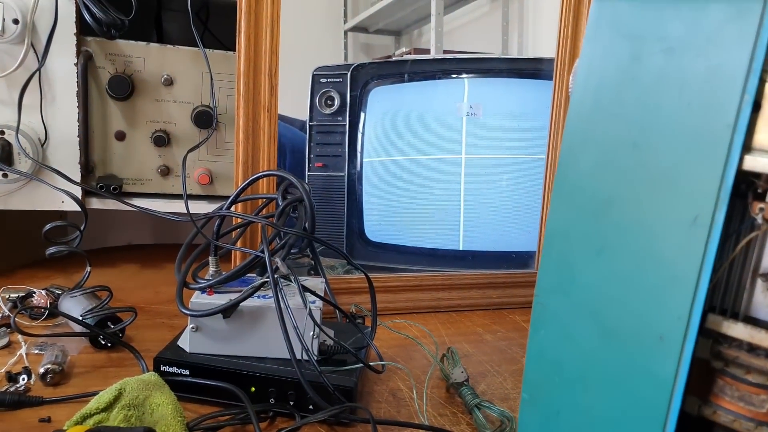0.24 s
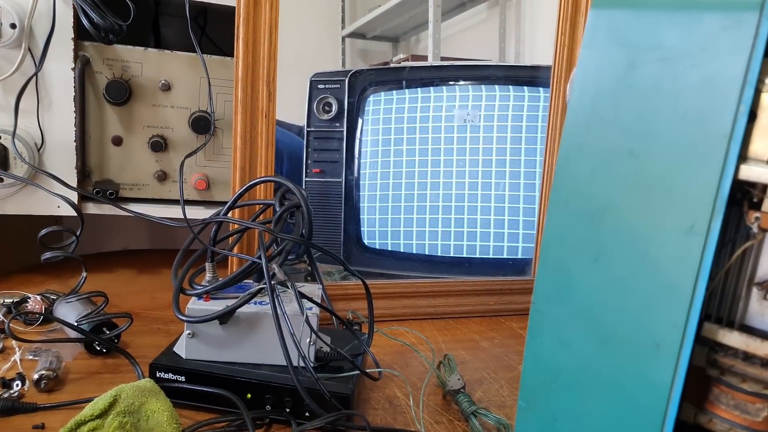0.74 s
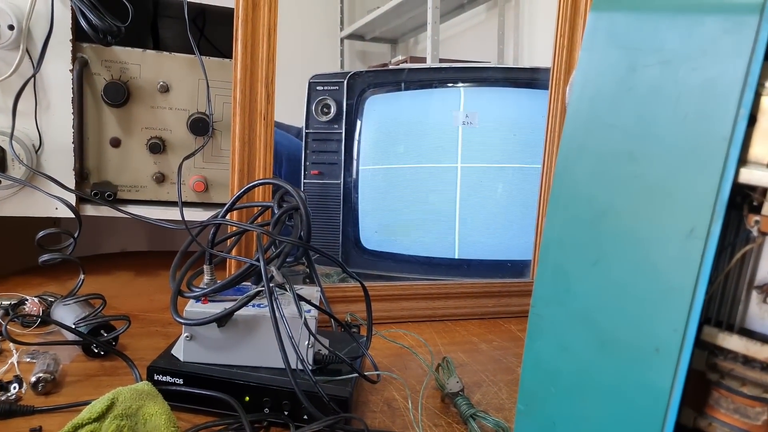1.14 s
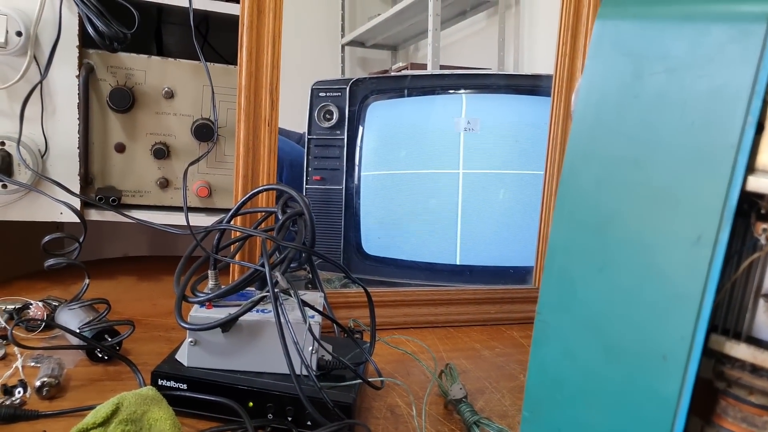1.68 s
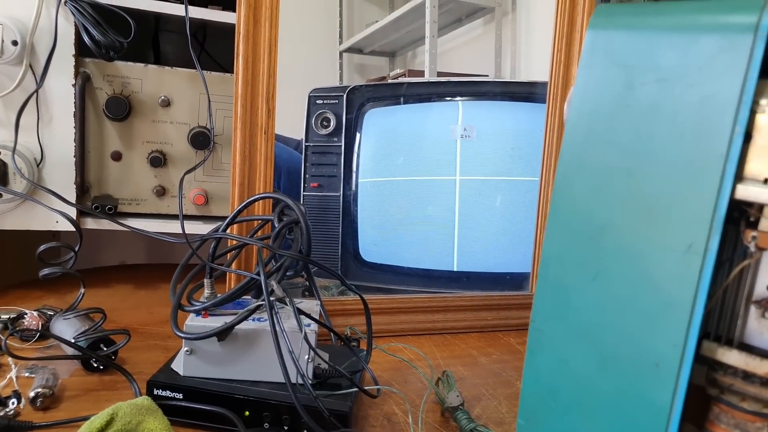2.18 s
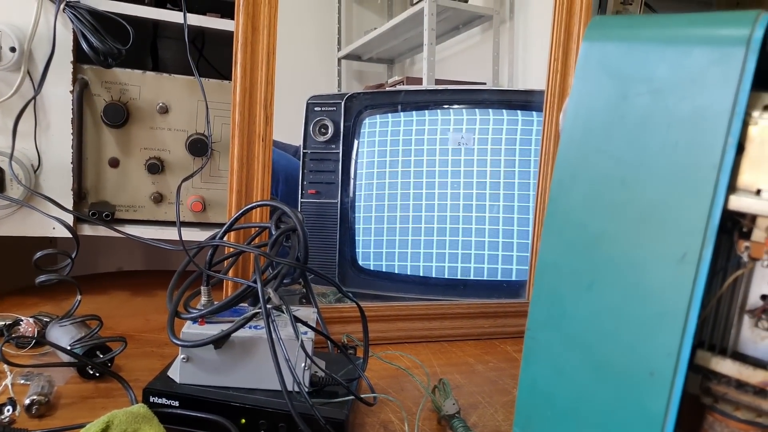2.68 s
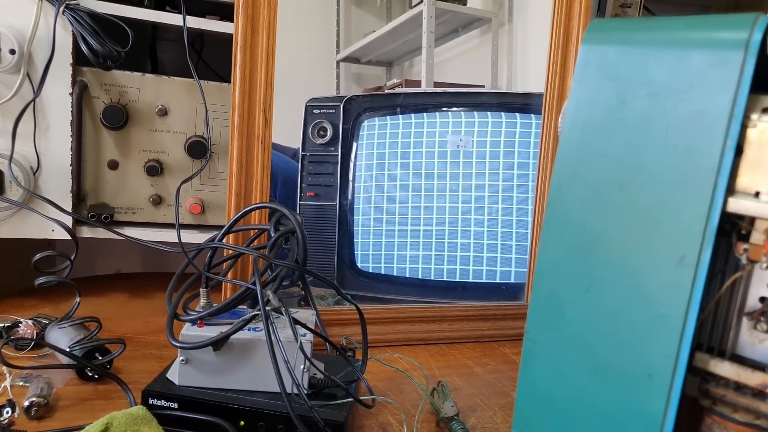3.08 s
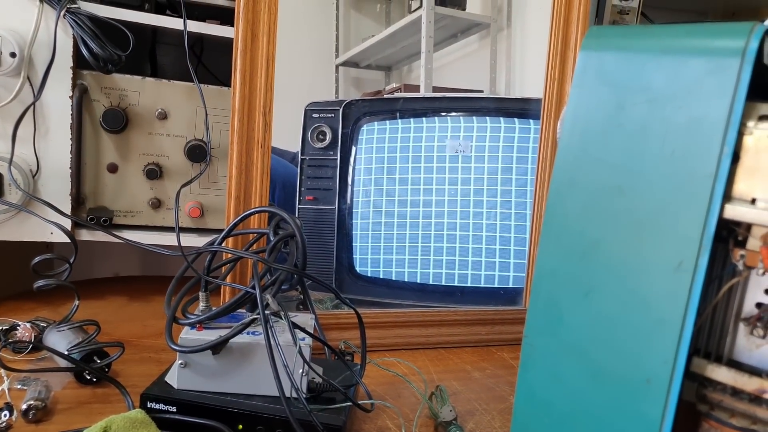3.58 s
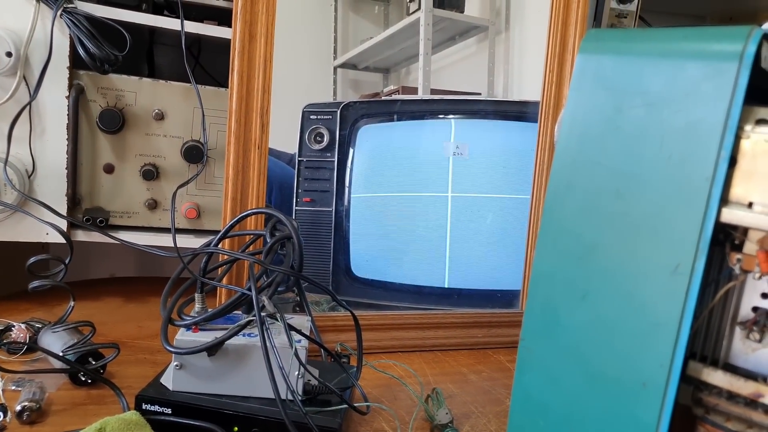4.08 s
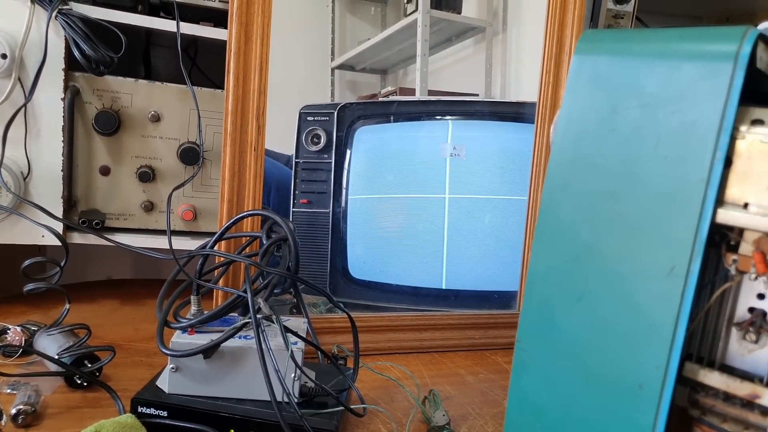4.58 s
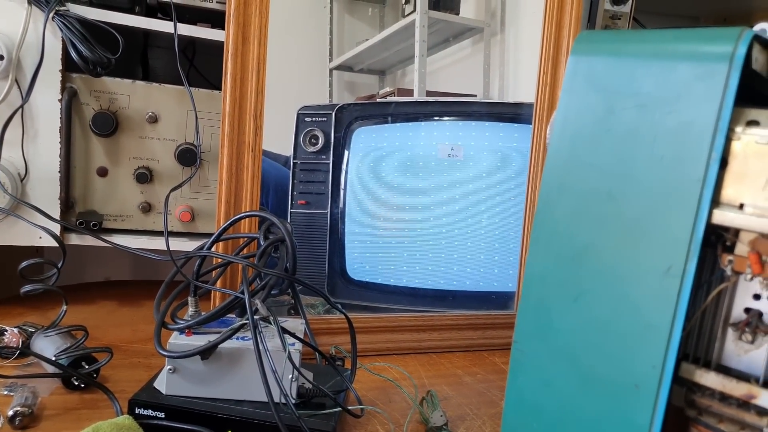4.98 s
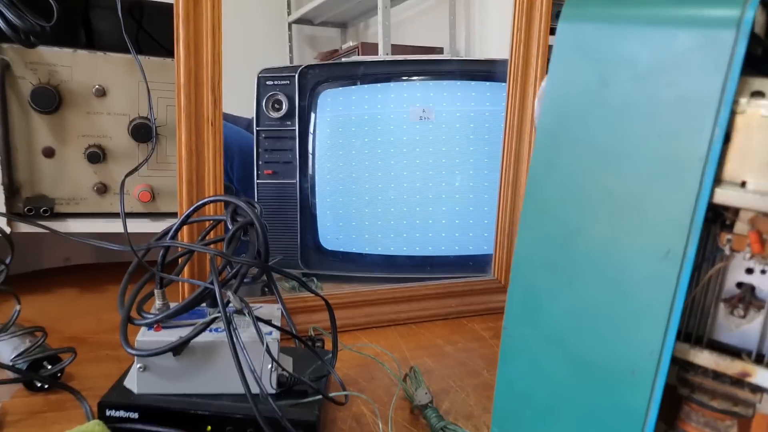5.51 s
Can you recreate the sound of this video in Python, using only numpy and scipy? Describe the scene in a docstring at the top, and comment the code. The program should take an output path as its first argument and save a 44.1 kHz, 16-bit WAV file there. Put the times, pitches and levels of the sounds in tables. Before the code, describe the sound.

A stiff selector knob on a metal instrument clunks through five crisp steps, each with short bright room reverb, above quiet hum-like rumble and tube-screen whistle.

```python
"""A rotary switch on a metal-cased bench instrument is stepped one way and back in a small hard room.
At each step a spring catch slips, snaps and bounces: clicks set off dying sines for the spring and case.
The room answers with echoes and a tail of fading noise, and the bench top booms.
Dull floor thumps are low sines; a soft rub is noise in three resonances.
A picture tube whistles one pure tone over rumble and hiss; one microphone feeds both channels."""
import sys
import numpy as np
from scipy import signal
from scipy.fft import rfft, irfft, next_fast_len
from scipy.io import wavfile

SR = 44100
rng = np.random.default_rng(int(sys.argv[2]) if len(sys.argv) > 2 else 0)


def transcribe(u):
    """Save the signal u as a 16-bit wav file named by the first command-line argument.

    u: samples, shape (n,) or (channels, n), limited to [-1, 1]; the rate is SR.
    q: integer samples, one column per channel.
    """
    v = np.clip(np.atleast_2d(u).T, -1, 1)
    q = np.round(v * 32767).astype(np.int16)
    wavfile.write(sys.argv[1], SR, q)


N = 253520

# In every table, fade60_s is the time to die by 60 dB.
WAYS = ("forward", "back")   # turning directions; a way of 0 or 1 picks one
# switch steps: snap_s, bright_snap_db, case_knock_db, bench_boom_db, slip_lead_s, slip_db,
# bounce_gap_s, first_bounce_db, direction
STEPS = [(0.47, -13, -20.5, -34, 0.0022, -34.5, .0005, -13, "forward"),
         (1.0152, -20.5, -23.5, -34, .0020, -35, .0006, -21, "back"),
         (2.5906, -12, -19, -37, 0.0022, -27, .0006, -15, "forward"),
         (4.0274, -19, -24, -28, .0032, -24, 0.001094, -17.5, "back"),
         (4.6152, -12.5, -19.5, -29, .0022, -23.5, .0025, -18, "forward")]
# the knob takes up its play before a step: start_s, bright_snap_db, case_knock_db, knock_pitch_hz, direction
TICKS = [(0.3877, -42, -50, 1454, "forward"), (2.366, -56, -49.5, 2300, "back")]
# short rings of spring and switch wafer: pitch_hz, forward_db, back_db, fade60_s
SNAP_RINGS = [(820, -5.5, -1.5, 0.01), (3190, 0.5, -12, 0.012), (5220, 1, -5, 0.0053),
              (10336, 1, 3, 0.0082), (10760, 1.5, 3, 0.0043), (11276, -3, -0.5, 0.018),
              (13150, -6.5, -2, 0.0049), (15000, -9, 0.5, 0.0074), (16300, -10, -9.5, .004)]
# longer rings of case and bench: pitch_hz, forward_db, back_db, fade60_s
CASE_RINGS = [(268.7, -23, -22, 0.35), (411.4, -26, -16, 0.45), (515.6, -19, -17, .5),
              (547.5, -26.5, -24.5, 0.45), (743, -22, -19.5, 0.35), (807.5, -20, -17.5, .3),
              (967, -14, -13.5, 0.22), (1007, -18, -27, 0.27), (1214, -17.5, -20.5, 0.33),
              (1514, -18, -21, .45), (1580, -25, -19.5, .27), (1745, -19.5, -30, 0.26),
              (1817, -16, -23.5, 0.25), (1965, -27.5, -19, .4), (2476, -28.5, -27, .3),
              (2990, -22.5, -16, 0.3), (3203, -21.5, -23.5, .35), (3230, -19, -30, 0.33),
              (4577, -24, -23.5, .25), (5100, -22, -22, 0.3)]
# reflections from bench and walls: delay_s, level_db
ECHOES = [(.0042, -8.5), (.0080, -20.5), (0.011, -23)]
# how fast the room dies away: pitch_hz, fade60_s
ROOM_FADE = [(120, 0.45), (320, 0.53), (840, 0.48), (2210, 0.43), (5820, 0.41), (15400, 0.3)]
# room tail level, one row per direction (forward, back): below_split_db, above_split_db
TAIL_DB = [(-5.5, -7), (-4, -5)]
# colour of the room tail in the range of the case: pitch_hz, forward_db_per_hz, back_db_per_hz
TAIL_BODY = [(69, -37.5, -45.5), (115, -7, -5.5), (221, -18.5, -9.5), (315, -7.5, -5), (534, -7.5, -4),
             (691, -14, -12.5), (960, -2.5, -7), (1105, -14, -7), (1155, -5, -5.5), (1520, -5.5, -7.5),
             (1660, -15, -5.5), (1750, -6, -9), (2230, -11, -7), (2496, -11, -12), (2713, -9, -9),
             (3250, -4.5, -12), (3460, -10, -14), (3760, -14, -17)]
# colour of the room tail in the treble, with the dip and peak of the microphone port:
# pitch_hz, forward_db_per_hz, back_db_per_hz
TAIL_TREBLE = [(3970, -19.5, -18.5), (4525, -13, -16), (4967, -11.5, -14), (6520, -24.5, -19.5),
               (8000, -38.5, -29.5), (8880, -21.5, -21), (10530, -12.5, -7.5), (11520, -15, -10.5),
               (12800, -25, -16), (14000, -24, -18), (15600, -26.5, -21.5)]
# dull thumps through the floor: start_s, strength_db, pitch_hz
THUMPS = [(1.484, -34.5, 52), (1.79, -36.5, 57.6), (3.265, -26.5, 75), (3.307, -32, 73.5),
          (4.941, -37, 54.7), (5.369, -34, 54.8)]
# bench resonances heard in the soft rub: pitch_hz, width_hz, level_db
RUB_RESONANCES = [(226.3, 50, -1), (378, 30, 2), (472, 30, 0)]
# level of the whistle over time: time_s, rms_db
WHISTLE_LEVEL = [(0, -68), (.2, -64), (.35, -74), (.7, -69.5), (.95, -68), (1.3, -66), (1.7, -57.5),
                 (2.2, -60), (2.8, -55.5), (3.45, -57), (4.1, -53.5), (5.0, -56), (5.2, -57), (5.3, -66),
                 (5.45, -78), (5.55, -71), (5.67, -79.5), (5.75, -63.5)]
# level of the steady background over time: time_s, rumble_db, hiss_db
BACKGROUND = [(0, -65, -66.5), (.4, -64.5, -66.5), (.85, -58, -63.5), (1.4, -61, -63.5), (2.55, -60, -62),
              (2.95, -58, -62), (3.2, -61.5, -62.5), (4.35, -59.5, -63), (5.1, -61.5, -63),
              (5.42, -64.5, -66), (5.75, -60, -64)]
# colour of the room rumble: pitch_hz, level_db_per_hz
RUMBLE = [(12, -45.5), (22, -24.5), (37, -8), (57, -0.5), (88, -8), (120, -5), (150, -9), (206, -9.5),
          (238, -12.5), (500, -18.5), (650, -46.5), (1100, -120)]
# colour of the hiss: pitch_hz, level_db_per_hz
HISS = [(180, -32), (300, -13.5), (365, -8.5), (766, -9), (889, -10), (1630, -13.5), (3970, -17.5),
        (7060, -28.5), (13200, -21), (14600, -24), (15300, -7)]
# how quickly the rumble level wanders: rate_hz, level_db_per_hz
LUMPS = [(1, 0), (5, 0), (15, -30), (200, -120)]

SPLIT_HZ = 6460   # knocks drive the sound below this, bright snaps above it
SWITCH_LOW_HZ = 70   # the switch sounds are cut away below this
SLIP_TICKS, SLIP_RISE_DB = 6, 7   # a slip is a run of small ticks that grows up to the snap
BOUNCES, BOUNCE_LOSS_DB = 3, 7   # each further bounce is weaker
LIGHT_KNOCK_DB = -14.5   # slips and bounces hardly knock the case
TICK_SHARPNESS = 2.2   # pitch divided by width of a tick's knock
CASE_RISE_S = 0.0042
BUILD_S, BUILD_CYCLES = 0.00063, 4.3   # the room fills later in the bass
BOOM_HZ, BOOM_RISE_S, BOOM_FADE60_S = 225, .03, .22   # lowest mode of the bench top
THUMP_CYCLES = 4.7   # cycles to die by 60 dB
RUB_START_S, RUB_DB, RUB_RISE_S, RUB_FADE60_S = 4.89, -54, .012, 1.2
WHISTLE_HZ = 15730
LUMP_DB = 1.5   # typical spread of the rumble level
NOISE_TOP_HZ = 15760   # coloured noise stops here
CUTOFF_HZ = 17150   # the microphone channel stops here


def from_db(db):
    """Turn decibels into a multiplier."""
    return 10 ** (np.asarray(db, float) / 20)


def rms_one(x):
    """Scale a sound so its rms (average strength) is 1."""
    return x / np.sqrt(np.mean(x ** 2) + 1e-20)


def in_time(rows):
    """Draw straight lines between the table's times, giving each column at every sample."""
    times, *columns = np.transpose(rows)
    return [np.interp(np.arange(N) / SR, times, column) for column in columns]


def at_hz(points, hz, column=1):
    """Read a table column at any pitch, spacing pitches by ratio as the ear does."""
    table = np.array(points)
    return np.interp(np.log(hz + 1), np.log(table[:, 0]), table[:, column])


def coloured(spectrum, size, column=1):
    """Shape white noise to a given spectrum, with rms 1."""
    hz = np.fft.rfftfreq(size, 1 / SR)
    gain = from_db(at_hz(spectrum, hz, column)) * (hz < NOISE_TOP_HZ)
    white = rfft(rng.standard_normal(size))
    return rms_one(irfft(white * gain, size))


def clicks(times, level_db):
    """Place single-sample clicks at the given times."""
    out = np.zeros(N)
    places = np.round(np.asarray(times) * SR).astype(int)
    np.add.at(out, places, from_db(level_db))
    return out


def switch(way):
    """Each contact in one direction rings the same parts; the room answers the main hits as a whole."""
    t = np.arange(32768) / SR
    response = add_echoes(rings(SNAP_RINGS, way, t))
    response += rings(CASE_RINGS, way, t) * (1 - np.exp(-t / CASE_RISE_S))
    tail = room_tail(way, t)
    steps = np.transpose([row[:-1] for row in STEPS if row[-1] == WAYS[way]])
    tick_snaps, tick_knocks = knob_ticks(way)
    snaps = clicks(steps[0], steps[1]) + tick_snaps
    knocks = clicks(steps[0], steps[2]) + tick_knocks
    light = clicks(*light_contacts(steps))

    low_tail_db, high_tail_db = TAIL_DB[way]
    out = 0
    for side, hits, light_db, tail_db in (("low", knocks, LIGHT_KNOCK_DB, low_tail_db),
                                          ("high", snaps, 0, high_tail_db)):
        near = signal.fftconvolve(hits + from_db(light_db) * light, response)
        room = signal.fftconvolve(hits, from_db(tail_db) * tail)
        split = signal.butter(4, SPLIT_HZ, side, fs=SR, output="sos")
        # the tiny offset keeps the filter from slowing down on near-zero numbers
        out = out + signal.sosfilt(split, (near + room)[:N] + 1e-18)
    low_cut = signal.butter(2, SWITCH_LOW_HZ, "high", fs=SR, output="sos")
    return signal.sosfilt(low_cut, out)


def light_contacts(steps):
    """The spring slips in small ticks before each snap and bounces after it: times and levels."""
    snap_s, _, _, _, lead_s, slip_db, gap_s, bounce_db = steps[:, :, None]
    # fraction of the lead time before the snap, one random spot per equal slot
    before = (np.arange(SLIP_TICKS) + rng.random((len(snap_s), SLIP_TICKS))) / SLIP_TICKS
    after = np.arange(BOUNCES)
    times = np.hstack([snap_s - lead_s * before, snap_s + gap_s * (after + 1)])
    levels = np.hstack([slip_db - SLIP_RISE_DB * before, bounce_db - BOUNCE_LOSS_DB * after])
    return times.ravel(), levels.ravel()


def knob_ticks(way):
    """Taking up the knob's play gives a faint click and a knock with a broad pitch."""
    snaps, knocks = np.zeros(N), np.zeros(N)
    for start_s, snap_db, knock_db, hz, direction in TICKS:
        if direction == WAYS[way]:
            snaps += clicks([start_s], snap_db)
            resonance = signal.iirpeak(hz, TICK_SHARPNESS, SR)
            knocks += signal.lfilter(*resonance, clicks([start_s], knock_db) + 1e-18)
    return snaps, knocks


def rings(modes, way, t):
    """A struck part rings as a sum of dying sines, here with alternating signs."""
    out = 0
    for k, row in enumerate(modes):
        hz, level_db, fade60_s = row[0], row[1 + way], row[3]
        fading = from_db(level_db - 60 * t / fade60_s)
        out = out + (-1) ** k * fading * np.sin(2 * np.pi * hz * t)
    return out


def add_echoes(snap):
    """Bench and walls return weaker, delayed copies of the snap."""
    out = snap.copy()
    for delay_s, echo_db in ECHOES:
        lag = round(delay_s * SR)
        out[lag:] += from_db(echo_db) * snap[:-lag]
    return out


def room_tail(way, t):
    """Scattered room sound: narrow bands of noise swell, then each dies at its own rate."""
    size = len(t)
    whole = rfft(coloured(TAIL_BODY + TAIL_TREBLE, size, 1 + way))
    hz = np.fft.rfftfreq(size, 1 / SR)
    edges = 40 * 2 ** (np.arange(28) / 3)   # a third of an octave apart
    out = 0
    for low, high in zip(edges, edges[1:]):
        band = irfft(whole * ((hz >= low) & (hz < high)), size)
        swell = 1 - np.exp(-t / (BUILD_S + BUILD_CYCLES / low))
        out = out + band * swell * from_db(-60 * t / at_hz(ROOM_FADE, low))
    return out


def boom():
    """The bench top swells and dies at its lowest mode after each step."""
    t = np.arange(SR // 2) / SR
    swell = 1 - np.exp(-(t / BOOM_RISE_S) ** 2)
    ring = swell * from_db(-60 * t / BOOM_FADE60_S) * np.sin(2 * np.pi * BOOM_HZ * t)
    hits = clicks([row[0] for row in STEPS], [row[3] for row in STEPS])
    return signal.fftconvolve(hits, ring)[:N]


def thumps():
    """Soft pushes through the floor: a low sine swells in about one cycle and dies."""
    out, t = np.zeros(N), np.arange(N) / SR
    for start_s, strength_db, hz in THUMPS:
        cycles = np.maximum(t - start_s, 0) * hz
        swell = 1 - np.exp(-cycles ** 2)
        fading = from_db(strength_db - 60 * cycles / THUMP_CYCLES)
        out += fading * swell * np.sin(2 * np.pi * cycles)
    return out


def soft_rub():
    """A low rub: noise in three bench resonances swells and fades."""
    noise, out = rng.standard_normal(N), 0
    for hz, width_hz, level_db in RUB_RESONANCES:
        peak = signal.iirpeak(hz, hz / width_hz, SR)
        # two passes make the resonance steeper
        out = out + from_db(level_db) * signal.lfilter(*peak, signal.lfilter(*peak, noise))
    age = np.maximum(np.arange(N) / SR - RUB_START_S, 0)
    swell = 1 - np.exp(-age / RUB_RISE_S)
    return from_db(RUB_DB - 60 * age / RUB_FADE60_S) * swell * rms_one(out)


def whistle():
    """The picture tube's line transformer sings a pure tone; its level wanders as the microphone moves."""
    level_db, = in_time(WHISTLE_LEVEL)
    tone = np.sin(2 * np.pi * WHISTLE_HZ * np.arange(N) / SR)
    return np.sqrt(2) * from_db(level_db) * tone   # root 2 turns rms into peak


def background():
    """Room rumble that comes in lumps, and hiss: two coloured noises with slowly changing levels."""
    rumble_db, hiss_db = in_time(BACKGROUND)
    size = next_fast_len(N)
    lumps = from_db(LUMP_DB * coloured(LUMPS, size))
    rumble = lumps * coloured(RUMBLE, size)
    hiss = coloured(HISS, size)
    return from_db(rumble_db) * rumble[:N] + from_db(hiss_db) * hiss[:N]


def scene():
    """Add all sources at one microphone and copy the sum to both channels."""
    steps = sum(switch(way) for way in range(len(WAYS)))
    mono = steps + boom() + thumps() + soft_rub() + whistle() + background()
    return np.tile(mono, (2, 1))


def record(dry):
    """Cut the top of the treble steeply."""
    top_cut = signal.cheby2(12, 70, CUTOFF_HZ, fs=SR, output="sos")
    return signal.sosfilt(top_cut, dry)


dry = scene()
out = record(dry)
transcribe(out)
```